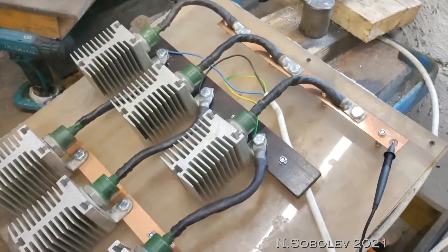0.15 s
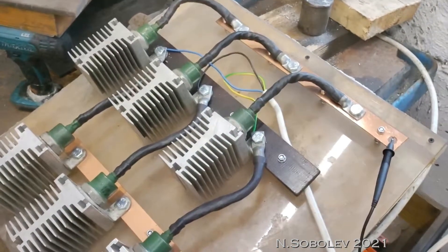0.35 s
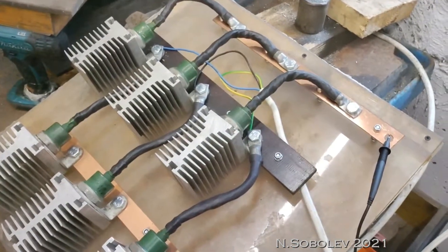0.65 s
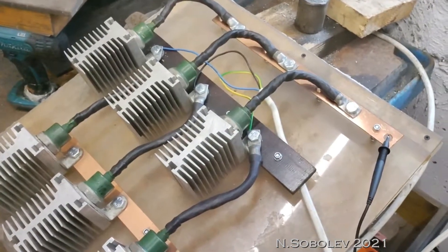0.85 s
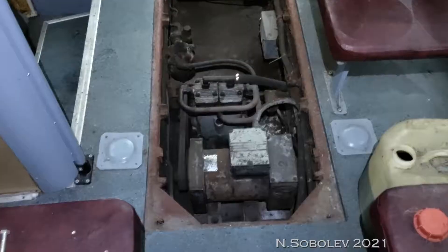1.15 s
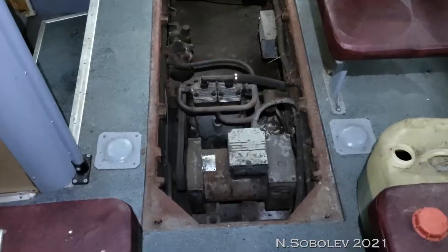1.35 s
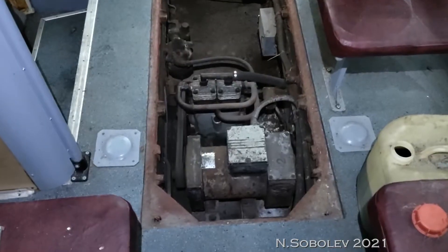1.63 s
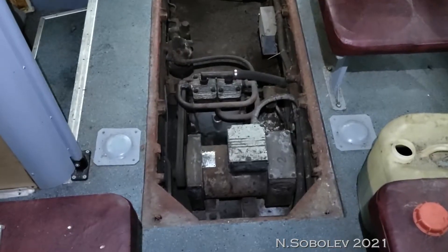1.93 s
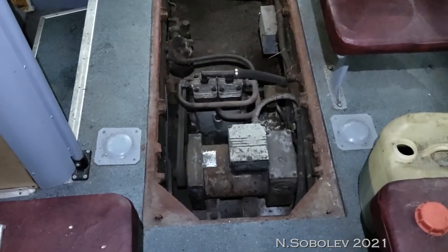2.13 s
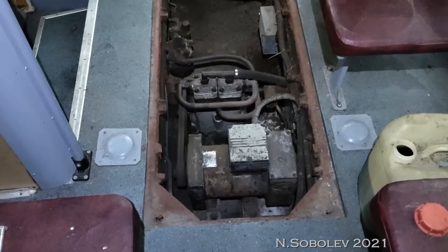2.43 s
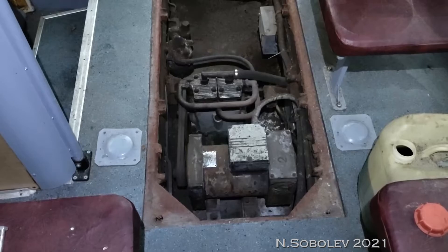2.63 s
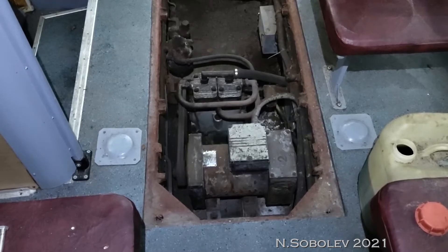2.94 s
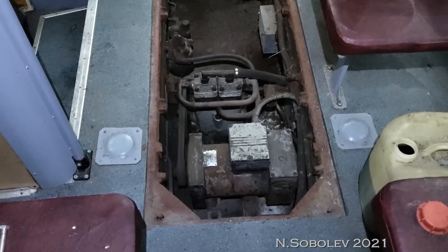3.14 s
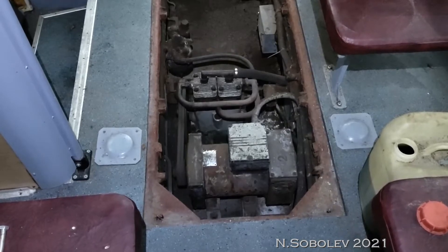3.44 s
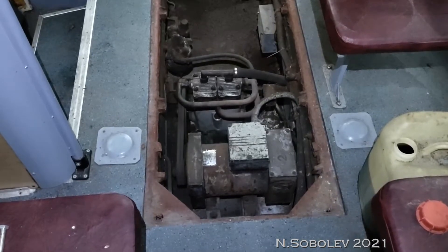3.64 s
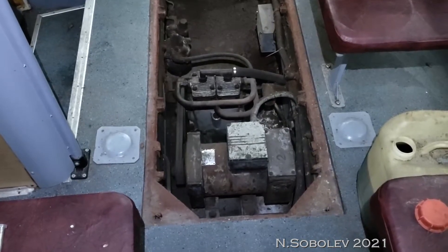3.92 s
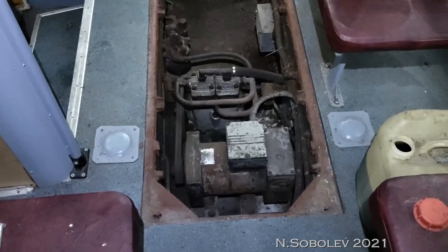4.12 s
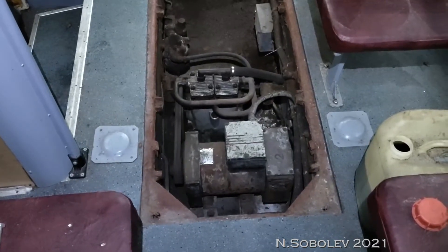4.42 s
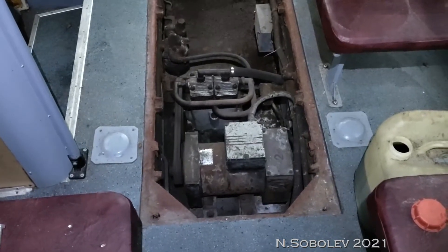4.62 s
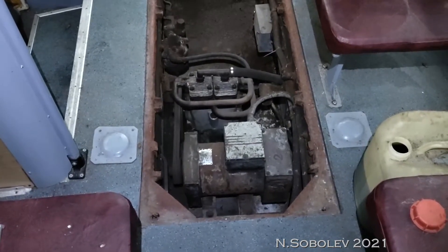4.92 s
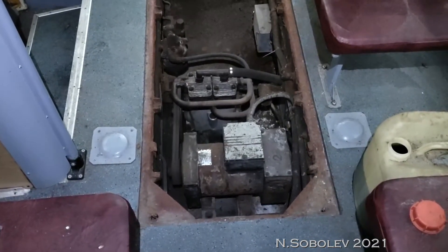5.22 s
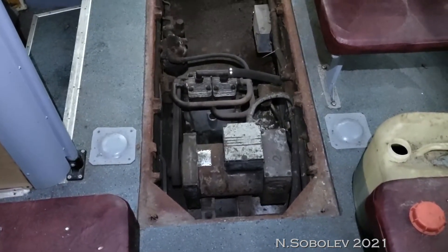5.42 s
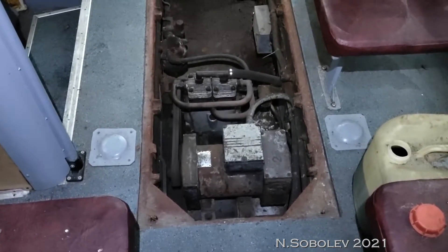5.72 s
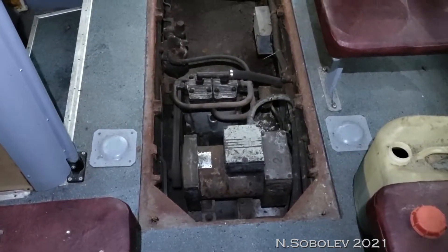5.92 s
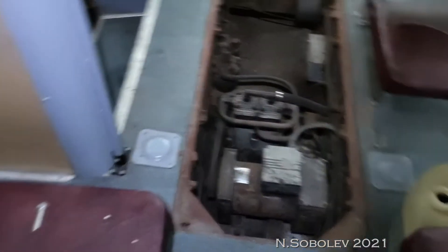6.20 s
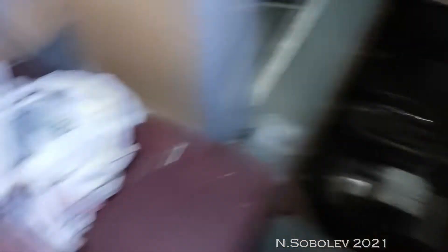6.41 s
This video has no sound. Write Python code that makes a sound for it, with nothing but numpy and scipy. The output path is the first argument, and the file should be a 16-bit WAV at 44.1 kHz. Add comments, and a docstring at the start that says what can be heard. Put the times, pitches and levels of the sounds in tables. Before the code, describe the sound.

First about a second of low, dull room noise and faint hum, ended by a small padded bump and a sudden cut. Then a loud compressor rises quickly in a parked vehicle's cabin, its rapid chugging about twelve beats a second, mixed with metallic chatter, wavering whine and airy hiss. It stays constant, heard from nearby in stereo, while a hard metallic clack rebounds and echoes late on the right.

```python
"""A quiet workshop, heard as coloured room noise with a faint wavering hum, and a soft bump of damped modes.
The workshop stops abruptly and a brief silence follows; then we are in the cabin of a parked vehicle.
A piston compressor under an open floor hatch swells in, with another soft bump, and runs steadily: its crank
times throbbing air pulses, clattering valves and gusts of hiss, while motor tones whine and drift.
Near the end something metal knocks sharply on the right, rebounds, rings and echoes in the cabin."""
import sys
import numpy as np
from scipy import signal
from scipy.fft import rfft, irfft
from scipy.io import wavfile
from scipy.ndimage import uniform_filter1d, minimum_filter1d

SR = 44100
rng = np.random.default_rng(int(sys.argv[2]) if len(sys.argv) > 2 else 0)


def materialize(psi):
    """Save the field psi as 16-bit PCM at rate SR to the path in sys.argv[1].

    A 1-D psi becomes a single channel; in a 2-D psi each row is a channel.
    """
    bounded = np.clip(np.atleast_2d(psi).T, -1, 1)
    quanta = np.round(bounded * 32767).astype(np.int16)
    wavfile.write(sys.argv[1], SR, quanta)


N = 289296
T = np.arange(N) / SR  # s
HZ = np.fft.rfftfreq(N, 1 / SR)
START_S, CRANK_HZ = 1.19, 12.591  # when the machine is first heard, and its turns per second at that moment
SIDES = np.array([[.5], [-.5]])  # shares a left-right difference in dB between the two microphones


def amp(db):
    """Decibels to gain."""
    return 10 ** (np.asarray(db) / 20)


def evened(x):
    """Scales to rms 1."""
    return x / np.sqrt(np.mean(x ** 2) + 1e-20)


def read(points, hz):
    """Reads a table by straight lines on a log-frequency axis."""
    table_hz, value = np.transpose(points)
    return np.interp(np.log(hz + 1), np.log(table_hz + 1), value)


def drift(rate_hz):
    """Slow chance of rms 1: white noise whose spectrum falls away above the rate."""
    spectrum = rfft(rng.standard_normal(N)) * np.exp(-(HZ / rate_hz) ** 2)
    return evened(irfft(spectrum, N))


def lean(points, hz):
    """Gains of the left and right microphone."""
    return amp(SIDES * read(points, hz))


def coloured(x, spectrum, ripple_db=3.0, ripple_hz=30):
    """Gives two unrelated signals a spectrum, the ripple of near walls and the likeness of the two microphones."""
    # Likeness of the microphones. Each row: frequency in Hz, left-right likeness from 0 to 1.
    likeness = [(50, 1), (100, 0.74), (250, 0.82), (500, 0.78), (1000, 0), (2000, 0.22), (5000, 0.0034),
                (15000, 0.017)]
    # Where the sound sits between the microphones. Each row: frequency in Hz, left-right difference in dB.
    seat_lean = [(60, 0), (250, 0), (600, 1), (800, -1.5), (1100, -2), (1900, -2), (2500, .5), (4200, .3),
                 (5200, -2), (6300, -4), (7200, 0), (13000, 0), (14000, -3.5), (15000, -7)]
    a, b = rfft(x)
    same = np.clip(read(likeness, HZ), -1, 1)
    pair = np.array([a, same * a + np.sqrt(1 - same ** 2) * b])
    steps = rng.standard_normal((2, SR // 2))
    walls = np.array([np.interp(HZ / ripple_hz, np.arange(len(row)), row) for row in steps])
    walls *= ripple_db * np.minimum(HZ / 4000, 1)  # short waves interfere most
    shaped = pair * amp(read(spectrum, HZ) + walls) * lean(seat_lean, HZ)
    return evened(irfft(shaped, N))


def noise(spectrum):
    """Steady stereo noise of that colour, at rms 1."""
    return coloured(rng.standard_normal((2, N)), spectrum)


def workshop(room_db=-55.5, hum_hz=78.0, hum_db=-55.5, end_s=1.11):
    """Room tone under a hum that rises at first and wavers; both stop abruptly."""
    # Colour of the room tone. Each row: frequency in Hz, relative level in dB per Hz.
    room_colour = [(15, -57), (25, -29), (48, -20), (60, -20), (80, -5), (104, -15.5), (168, -17.5),
                   (197, -22), (326, -25), (569, -34.5), (649, -32.5), (1600, -36.5), (2800, -44.5),
                   (4370, -45), (5540, -55.5), (14000, -59)]
    rise = np.minimum(T / 0.46 + 0.16, 1)
    hum = amp(hum_db + 1.2 * drift(4.4)) * np.sin(2 * np.pi * hum_hz * T) * rise
    stop = np.clip((end_s - T) / 0.0077, 0, 1)
    return (amp(room_db) * noise(room_colour) + hum) * stop


def struck(s, hz, db, t60):
    """One dying mode, set going over its first half cycle."""
    age = np.maximum(T - s, 0)
    onset = np.sin(np.pi * np.minimum(hz * age, .5)) ** 2
    return amp(db - 60 * age / t60) * np.sin(2 * np.pi * hz * age) * onset


def bumps(dull_hz=1620):
    """Padded blows: a few heavily damped modes and no treble."""
    # Modes of the soft bumps. Each row: start in seconds, frequency in Hz, level in dB, t60 in seconds.
    bump_modes = [(1.0265, 158, -14.5, 0.016), (1.02665, 1054, -22, 0.0043), (1.02825, 1200, -29, 0.003),
                  (1.389, 50, -19.5, 0.058), (1.394, 170, -15, 0.061)]
    padding = signal.butter(12, dull_hz, fs=SR, output="sos")
    return signal.sosfilt(padding, sum(struck(*row) for row in bump_modes))


def crank(wobble_turns=.0004):
    """Turns of the crank so far; it slows a little as the tank fills."""
    start_turn, sag_hz_per_s = .849, .0035  # where it stands at the start in turns, and its loss of speed
    age = T - START_S
    return start_turn + CRANK_HZ * age - sag_hz_per_s * age ** 2 / 2 + wobble_turns * drift(4.2)


def gust(turns, place, attack, hold, release, rise_db):
    """A gain that rises, holds and falls back once a turn."""
    corners = np.cumsum([0, attack, hold, release])
    return amp(rise_db * np.interp((turns - place) % 1, corners, [0, 1, 1, 0]))


def gusts(turns, rows):
    """Several gusts in each turn, as one gain."""
    return np.prod([gust(turns, *row) for row in rows], axis=0)


def resonances(modes, hz):
    """Response of a set of modes that swell briefly before they die away."""
    return sum(amp(db) / (1 + 2j * (hz - mode_hz) / width) ** 3 for mode_hz, width, db in modes)


def squeeze(place, start, length, first_hz, last_hz, db):
    """The rising tone of one piston stroke, over one turn."""
    gone = np.minimum((place - start) % 1 / length, 1)
    cycles = gone * length / CRANK_HZ * (first_hz + (last_hz - first_hz) * gone / 2)
    return amp(db) * np.sin(np.pi * gone) * np.sin(2 * np.pi * cycles)


def throb(turns, level_db=-19, waver_db=0.3, size=4096, count=60):
    """Valve puffs ring the pipework and reeds, and each stroke sweeps upward; all repeat with the crank."""
    # Puffs of the valves in one turn; the two strongest are the two pistons opening.
    # Each row: place in the turn 0-1, push on the pipework in dB, push on the valve reeds in dB.
    puff_rows = [(0.852, 7.6, 0.4), (0.079, -21, -0.5), (0.297, 3.4, -5), (0.438, -0.7, -26),
                 (0.567, -24, -6)]
    # What every puff rings: pipework, then reeds. Each row: frequency in Hz, width in Hz, relative level in dB.
    pipe_modes = [(84.6, 10.2, -41.6), (133.2, 20, -23.8), (146.7, 31, -28.3), (168.2, 97, -35.4),
                  (290.4, 15.7, -40.5), (395.8, 23, -49.7)]
    reed_modes = [(491.5, 4, -44), (556.7, 156, -38.8), (569.8, 10, -34.5), (682, 83, -51.6)]
    # The air in the cylinders and under the valve reed rings higher as the pistons squeeze it.
    # Each row: place in the turn 0-1, length in turns, first Hz, last Hz, relative level in dB.
    stroke_rows = [(0.322, 0.605, 259.7, 442.4, -26.9), (0.846, 0.838, 241.2, 265.9, -32.5),
                   (0.861, 0.266, 582.1, 776.1, -27.8)]
    # Spread over the microphones. Each row: frequency in Hz, side-to-mid level in dB.
    side_table = [(60, -60), (150, -51), (250, -14), (400, -9), (550, -13.5), (730, -4.5)]
    # Balance of the microphones. Each row: frequency in Hz, left-right difference in dB.
    throb_lean = [(100, 0), (200, -0.5), (400, -2), (560, 6.5), (700, -4.5)]

    order, place = np.arange(3, count + 1), np.arange(size) / size  # harmonics of the crank; one turn
    hz = order * CRANK_HZ
    pipe, reed = resonances(pipe_modes, hz), resonances(reed_modes, hz)
    puffs = sum((amp(pipe_db) * pipe + amp(reed_db) * reed) * np.exp(-2j * np.pi * order * at)
                for at, pipe_db, reed_db in puff_rows)
    strokes = rfft(sum(squeeze(place, *row) for row in stroke_rows))[order] * 2 / size
    # standing waves in the cabin reach the two microphones out of step
    side = amp(read(side_table, hz)) * rng.choice([-1, 1], len(hz))
    pair = (puffs + strokes) * (1 + 1j * np.array([side, -side])) * lean(throb_lean, hz)
    cycle = (pair @ np.exp(2j * np.pi * order[:, None] * place)).real
    repeated = np.array([np.interp(turns % 1, place, channel) for channel in cycle])
    return evened(repeated) * amp(level_db + waver_db * drift(2.5))


def whine(turns, ripple=0.00037, waver_db=1.4, fade_db=1.6):
    """Motor and gear tones that fade and flutter; the shaft slows a little at every compression."""
    # Each row: frequency in Hz at the starting crank speed, level in dB rms before the swell, wander in cycles rms.
    tone_rows = [(564, -44, .1), (843, -49, .05), (905.8, -48, .06), (956.2, -50, .06), (1094.6, -50, .06),
                 (1182.7, -48, .08), (1207.8, -38.5, .08), (1245.5, -48, .1), (1588, -43.5, .12),
                 (1965, -41, .12), (2353, -53, .12), (2665, -53, .2)]
    shaft = turns + ripple * np.sin(2 * np.pi * turns)
    out = np.zeros((2, N))
    for hz, db, wander in tone_rows:
        fade = fade_db * drift(6.3)
        angle = hz / CRANK_HZ * shaft + wander * drift(7.7) + rng.random()
        for side in out:  # each microphone adds its own waver and flutter
            flutter = 0.081 * drift(6.2)
            tone = amp(fade + waver_db * drift(8.7)) * np.sin(2 * np.pi * (angle + flutter))
            side += amp(db) * evened(tone)
    return out


def ring(x, t60):
    """A dense dying response, another one at each microphone."""
    t = T[:SR // 2]
    tail = rng.standard_normal((2, len(t))) * amp(-60 * t / t60)
    tail /= np.linalg.norm(tail[0])
    return signal.fftconvolve(np.atleast_2d(x), tail, axes=1)[:, :N]


def clatter(turns, colour, count=22, loose=0.25, play_s=0.00006, accent_db=2.2, accent_place=0.42,
            t60=0.06, spots=5):
    """Gear teeth and valve plates tap the casing at several spots, hardest under compression, never quite alike."""
    at = np.flatnonzero(np.diff(np.floor(turns * count)))
    force, slip = np.clip(rng.standard_normal((len(at), 2)), -2, 2).T
    tooth = np.floor(turns[at + 1] * count).astype(int) % count
    seat = rng.uniform(0, .001, count)[tooth]  # every tooth has its own small delay in s
    load = amp(accent_db * np.cos(2 * np.pi * (turns[at] - accent_place)))
    delay = np.round((seat + play_s * slip) * SR).astype(int)
    when = np.clip(at + delay, 0, N - 1)
    taps = np.zeros((spots, N))
    taps[tooth % spots, when] = load * np.exp(loose * force)
    return coloured(sum(ring(spot, t60) for spot in taps), colour)


def chirps(turns, level_db=2.0, rise_s=.0012, uneven_db=2.0, detune=.005):
    """Each flap of a reed is a short ping, a little different every time."""
    # The reeds flap at the same places in every turn.
    # Each row: place in the turn 0-1, frequency in Hz, relative level in dB.
    flap_rows = [(0.365, 4850, -32), (0.432, 4830, -31), (0.515, 4850, -32), (0.582, 4930, -30),
                 (0.62, 4900, -35), (0.76, 4880, -34), (0.79, 12400, -42), (0.862, 12400, -37)]
    t, out = T[:SR // 100], np.zeros((2, N + SR))
    shape = t / rise_s * np.exp(1 - t / rise_s)
    for place, hz, db in flap_rows:
        for at in np.flatnonzero(np.diff(np.floor(turns - place))):
            force, pitch = rng.standard_normal(2)
            cycles = hz * (1 + detune * pitch) * t + rng.random((2, 1))
            ping = shape * np.sin(2 * np.pi * cycles)
            out[:, at:at + len(t)] += amp(level_db + db + uneven_db * force) * ping
    return out[:, :N]


def compressor(flutter_db=0.56, uneven_db=2.0):
    """Everything follows the crank; no two gusts of air are quite alike."""
    # Colours of the rumble, the casing, the delivered air, the air drawn in and the leaking air.
    # Each row: frequency in Hz, relative level in dB per Hz.
    rumble_colour = [(20, -15), (38, -6.5), (52, -12), (75, -5), (130, -9.5), (210, 4), (255, -4),
                     (330, -3.5), (430, -15.5), (500, -10.5), (610, -8), (680, -11), (760, -22),
                     (1000, -35)]
    casing_colour = [(600, -40), (720, -5.5), (800, -7.5), (900, 1), (980, -3), (1050, 1), (1140, 0),
                     (1180, 0.5), (1250, 1.5), (1310, -4.5), (1400, -1.5), (1500, -5), (1590, -1),
                     (1660, -1.5), (1750, -6), (1860, -3), (1960, 0), (2040, -5.5), (2380, -6.5),
                     (2520, -11), (2700, -7.5), (2950, -19), (4000, -26), (9000, -40)]
    delivery_colour = [(2000, -35), (2800, -13), (3150, -1.5), (3350, -11.5), (3700, -2.5), (4050, -7),
                       (4450, 1), (5200, -.5), (6400, 2), (6750, -3), (7050, -12.5), (7400, -13),
                       (8100, -9), (8700, -30), (9400, -10.5), (10000, -17.5), (10700, -11.5), (11600, -20),
                       (12400, -14), (15500, -14)]
    intake_colour = [(7000, -40), (9500, -15), (12000, -20), (13300, -10), (14100, -6), (14800, 1),
                     (15200, 0), (15600, -6)]
    leak_colour = [(6500, -40), (7400, 10.5), (8100, -5), (8700, -18), (9500, -11), (10100, -8),
                   (10700, 0.5), (11600, 1), (12400, 7.5), (13300, 5), (14500, 3), (15600, -8)]
    # Gusts: rumble under each piston's stroke, casing rattle under compression, air leaving the cylinders
    # with a surge as the valve opens, air drawn in, and air leaking past the pistons.
    # Each row: place in the turn 0-1, attack, hold and release in turns, rise in dB.
    rumble_gusts = [(0.28, 0.08, 0.18, 0.15, 4.5), (0.83, 0.05, 0.15, 0.15, 4.5)]
    rattle_gust = (0.05, 0.33, 0.1, 0.52, 2)  # a single row
    delivery_gusts = [(0.15, 0.17, 0.45, 0.34, 2.5), (0.24, 0.08, 0.16, 0.16, 2.4)]
    intake_gust = (0.11, 0.13, 0.09, 0.08, 9)  # a single row
    leak_gust = (0.72, 0.17, 0.03, 0.12, 1.9)  # a single row
    # levels in dB, before the gusts and the swell
    rumble_db, clatter_db, casing_db = -30.5, -29, -33
    delivery_db, intake_db, leak_db = -33, -41.5, -43
    swell_s, swell_bend, entry_db = 0.28, 1.3, -24  # time to full level, bend (1 = straight), level at entry

    turns = crank()
    rumble = amp(rumble_db) * gusts(turns, rumble_gusts) * noise(rumble_colour)
    taps = amp(clatter_db) * clatter(turns, casing_colour)
    rattle = amp(casing_db) * gust(turns, *rattle_gust) * noise(casing_colour)
    outflow = gusts(turns, delivery_gusts)
    inflow = gust(turns, *intake_gust) * amp(uneven_db * drift(30))
    delivery = amp(delivery_db + flutter_db * drift(110)) * outflow * noise(delivery_colour)
    intake = amp(intake_db + flutter_db * drift(120)) * inflow * noise(intake_colour)
    leak = amp(leak_db) * gust(turns, *leak_gust) * noise(leak_colour)
    metal = taps + rattle + chirps(turns)
    machine = throb(turns) + rumble + whine(turns) + metal + delivery + intake + leak
    swell = np.clip((T - START_S) / swell_s, 0, 1) ** swell_bend
    entry = amp(entry_db) * np.clip((T - START_S) / 0.015, 0, 1)
    return machine * np.maximum(swell, entry)


def knock(cabin_t60=.36):
    """A sharp metal blow on the right rebounds softly, rings and echoes in the cabin."""
    # The blow and its rebounds. Each row: start in seconds, relative dB of the ring, relative dB of the sharp crack.
    blows = [(6.0952, 0, 0), (6.116, -16, -22), (6.152, -16, -20), (6.164, -9, -28)]
    # What the knocked metal rings with. Each row: frequency in Hz, relative level in dB, t60 in seconds.
    metal_modes = [(1350, -35, 1.9), (1560, -21, 0.09), (1720, -14, 0.07), (1900, -19, 0.08),
                   (4050, -16, .02), (4750, -7.5, .022), (5350, -13, .018)]
    # Colour of the crack. Each row: frequency in Hz, relative level in dB per Hz.
    crack_colour = [(500, -22), (1200, -5), (1700, 1), (2700, -7), (3500, -9), (4200, 0), (5000, 1.5),
                    (5700, 1), (6400, 2.5), (7500, -6), (15000, -4), (17000, -30)]
    crack_db, crack_t60, cabin_db = -11.5, .019, 3  # the echo level is a gain on the crack's ring
    crack_lean_db, modes_lean_db = -4, -9  # left-right

    burst = sum(amp(db - 60 * np.maximum(T - s, 0) / crack_t60) * (T > s) for s, _, db in blows)
    crack = amp(crack_db) * burst * noise(crack_colour)
    seats = signal.butter(3, 7400, fs=SR)  # the seats soak up the treble
    echo = signal.lfilter(*seats, ring(crack, cabin_t60))
    modes = np.zeros(N)
    for s, dull_db, sharp_db in blows:
        for hz, db, t60 in metal_modes:
            blow_db = sharp_db if hz > 3000 else dull_db
            modes += struck(s, hz, db + blow_db, t60)
    return amp(SIDES * crack_lean_db) * crack + amp(SIDES * modes_lean_db) * modes + amp(cabin_db) * echo


def scene():
    """All sources at the two microphones."""
    return workshop() + bumps() + compressor() + knock()


def record(dry):
    """A look-ahead limiter ducks the loudest peaks; then the band limit."""
    ceiling_db, recover_db_per_s, edge_hz = -3.8, 1400, 15580
    over_db = np.maximum(20 * np.log10(abs(dry).max(0) + 1e-9) - ceiling_db, 0)
    over_db = -minimum_filter1d(-over_db, size=300)  # the highest peak nearby, ahead or behind
    held_db = np.maximum.accumulate(over_db + recover_db_per_s * T) - recover_db_per_s * T
    limited = dry * amp(-uniform_filter1d(held_db, size=80))
    band = signal.firwin(1023, edge_hz, window=("kaiser", 9), fs=SR)
    return signal.oaconvolve(limited, band[None], "same")


dry = scene()
out = record(dry)
materialize(out)
```